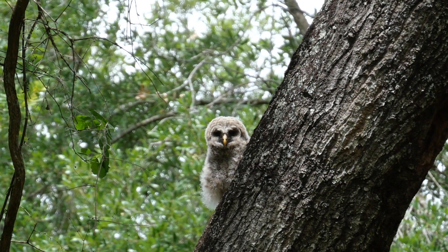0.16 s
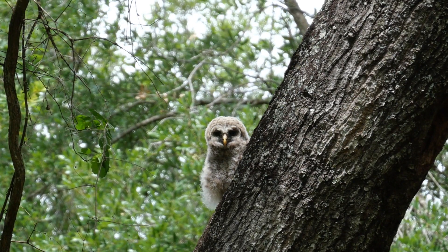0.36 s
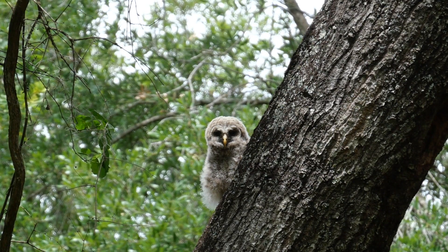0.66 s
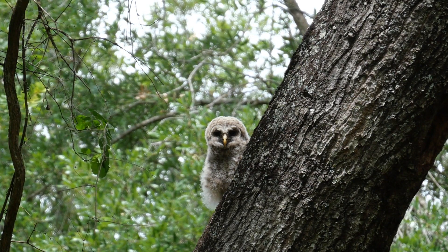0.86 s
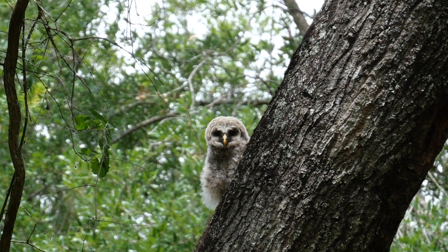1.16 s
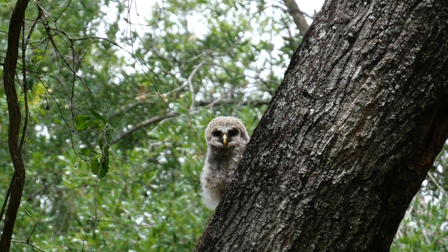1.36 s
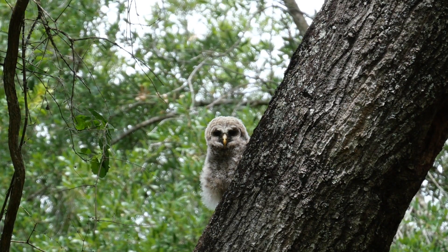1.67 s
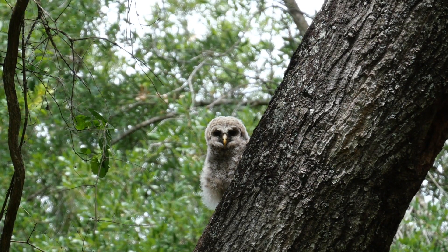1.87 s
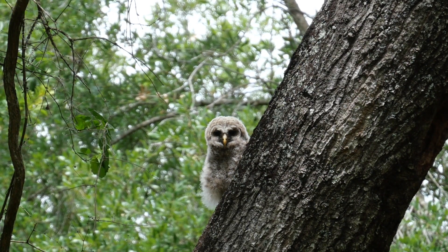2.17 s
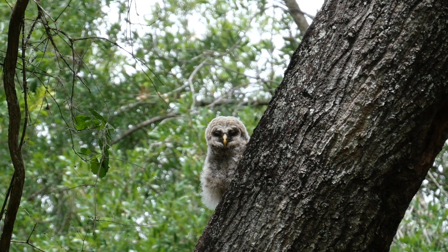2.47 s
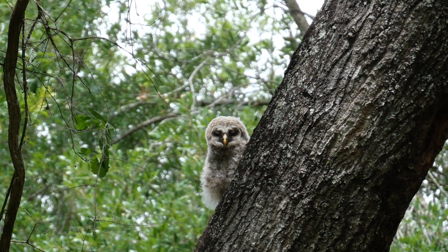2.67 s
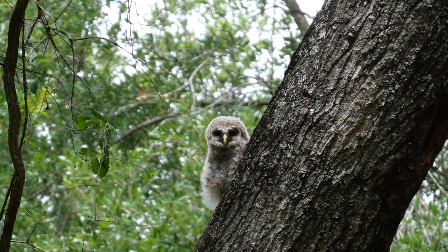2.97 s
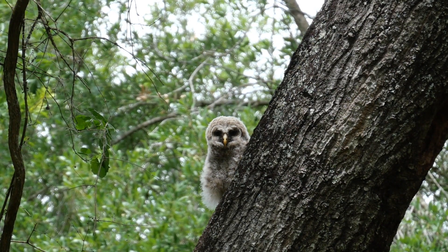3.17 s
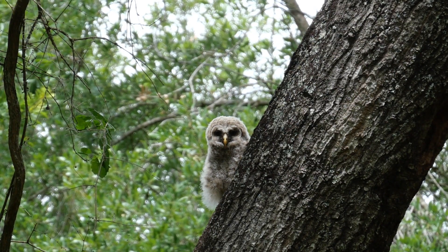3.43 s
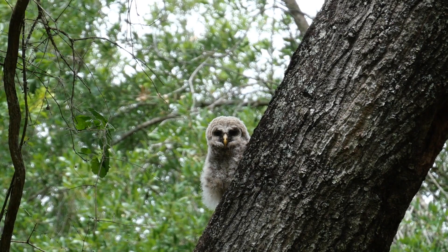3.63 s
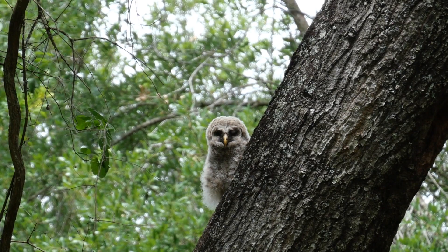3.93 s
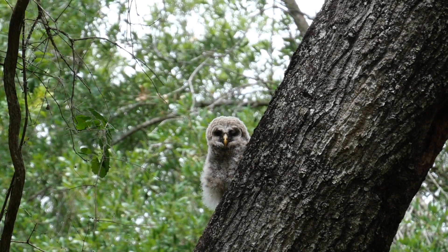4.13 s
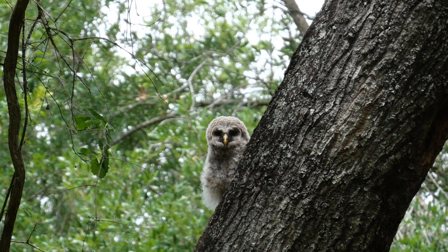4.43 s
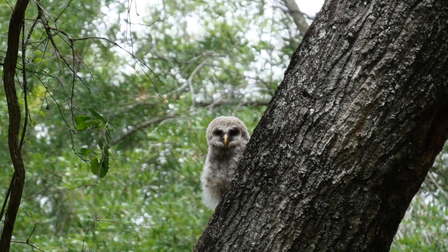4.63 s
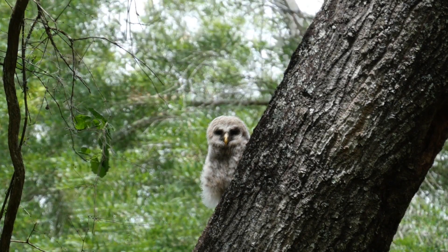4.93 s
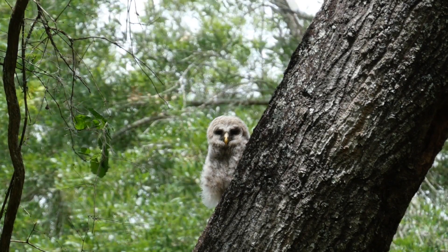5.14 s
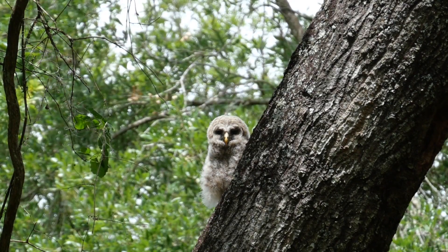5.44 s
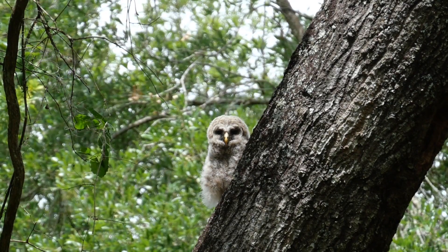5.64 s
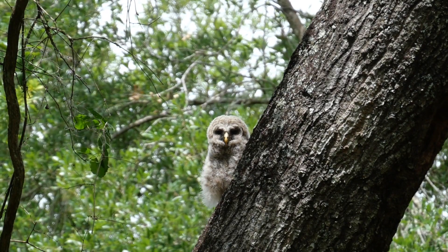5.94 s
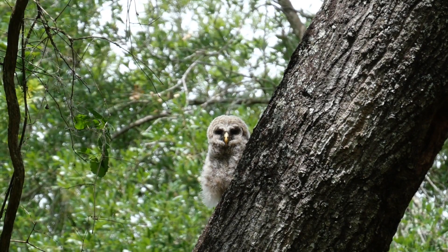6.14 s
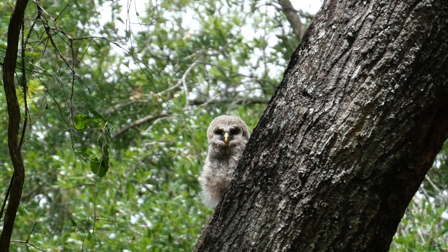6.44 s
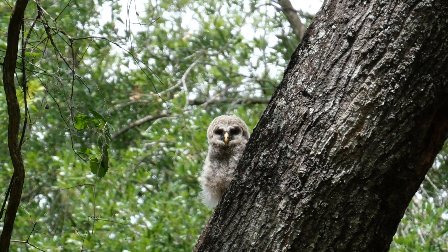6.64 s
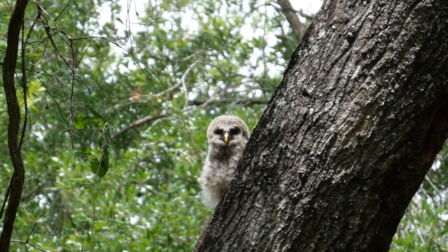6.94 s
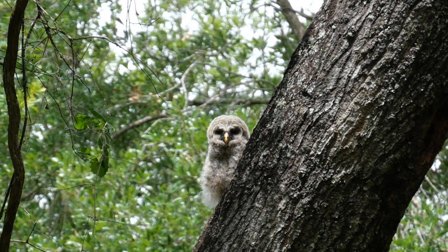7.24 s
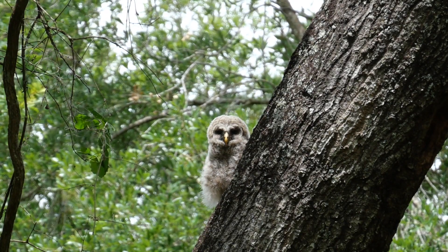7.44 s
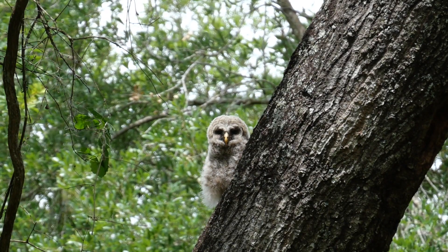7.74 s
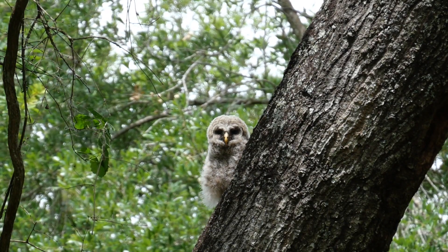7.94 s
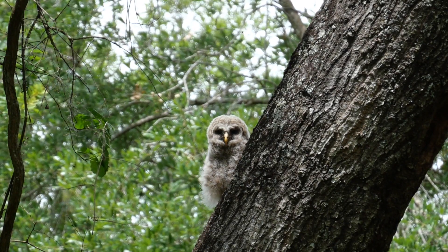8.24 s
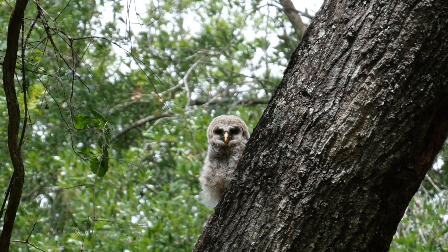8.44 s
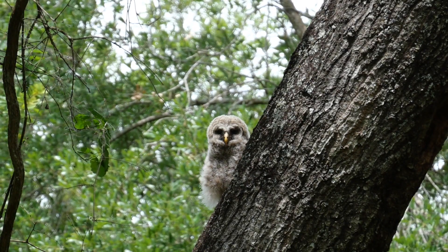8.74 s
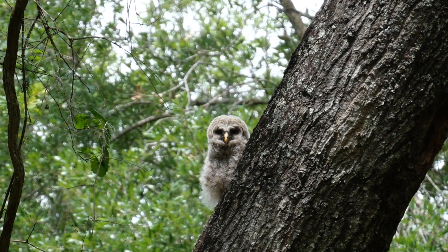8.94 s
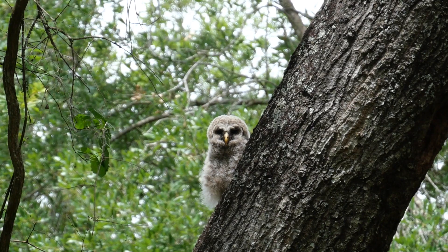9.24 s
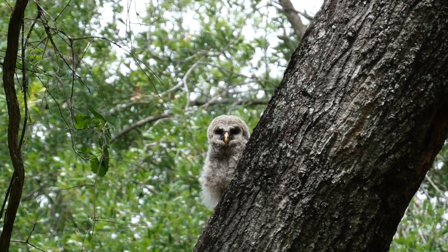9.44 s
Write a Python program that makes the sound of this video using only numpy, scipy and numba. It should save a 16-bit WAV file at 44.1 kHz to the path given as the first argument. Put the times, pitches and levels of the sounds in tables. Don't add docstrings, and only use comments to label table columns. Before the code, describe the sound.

In echoing woods, cicadas buzz steadily as an owl croaks, pauses, then cackles in an even run amid quick songbird phrases.

```python
import sys
import numpy as np
from scipy import signal
from scipy.fft import rfft, irfft
from scipy.io import wavfile
from numba import njit

SR = 44100
rng = np.random.default_rng(int(sys.argv[2]) if len(sys.argv) > 2 else 0)


def log_audio(samples):
    frames = np.atleast_2d(samples).T
    limited = np.clip(frames, -1, 1)
    pcm = np.round(limited * 32767).astype(np.int16)
    wavfile.write(sys.argv[1], SR, pcm)


def linear_from_db(decibels):
    return 10 ** (np.asarray(decibels, float) / 20)


N = 423360
LEAD = SR // 4

# (frequency [Hz], density [dB per Hz])
AIR_SPECTRUM = [(12, -43), (20, -10), (50, -1.5), (119, 1), (209, -6), (340, -14), (734, -21),
                (1210, -24.5), (2370, -26.5), (3810, -31), (6500, -32), (10800, -22.5), (11300, -38.5),
                (15800, -33)]
# (time [s], level [dB])
TRAFFIC_LEVEL = [(0, -55.5), (2, -54.5), (4.2, -53.5), (5, -55), (6, -54), (8, -54), (9.2, -52.5),
                 (9.6, -53)]
# (frequency [Hz], side minus mid [dB])
AIR_WIDTH = [(30, -21), (100, -36.5), (300, -20), (950, -14), (2380, -10.5), (5500, -3.5), (8500, -18),
             (11000, -46.5)]
# (low pitch [Hz], swing [Hz], strokes [per s], blur [Hz])
CICADA_DRUMS = [
    (9260, 1380, 70.5, 80),
    (9850, 560, 66.5, 150),
    (7350, 800, 69.0, 250),
]
# (before the hand-over [dB], after it [dB])
CICADA_LEVELS = [
    (-58, -60),
    (-73.5, -57),
    (-70.5, -68.5),
]
CICADA_THROB = [0, 0, 3.5]
# (start [s], length [s], voice [Hz], level [dB], slipped pulses [0-1])
NEAR_CROAKS = [(-.085, 0.05, 1018, -42.5, 0.19), (.39, 0.072, 1020, -45.5, 0.37),
               (1.205, 0.067, 1019, -45.5, 0.55), (1.738, 0.058, 971, -47.5, .7),
               (4.952, 0.071, 1007, -48, 0.22), (5.283, 0.062, 1029, -43, 0),
               (5.54, 0.06, 1044, -43.5, 0.31), (5.842, 0.054, 1048, -42, 0.1),
               (6.139, 0.069, 1053, -43, 0.4), (6.476, 0.065, 1060, -41.5, 0.14),
               (6.815, 0.069, 1057, -40.5, 0.19), (7.12, 0.045, 1033, -41, 0.55),
               (7.486, 0.0738, 1069, -40.5, .05), (7.868, 0.073, 1077, -39.5, 0.02),
               (8.261, 0.073, 1066, -40, .03), (8.668, 0.077, 1059, -39.5, 0.09),
               (9.083, .076, 1059, -40.5, .03), (9.508, 0.084, 1062, -39.5, .03)]
# (centre [Hz], width [Hz], level [dB])
UPPER_THROAT = (3150, 900, -8)
# (frequency [Hz], time [s])
WOOD_DECAY = [(500, 1.16), (1000, 1.04), (2500, 1.21), (3600, 1.4), (5600, 2.4), (9000, 0.76)]
# (start [s], length [s], from [Hz], to [Hz], level [dB])
HOARSE_NOTES = [
    (1.09, 0.078, 4730, 4600, -70.5),
    (2.69, 0.19, 2440, 2370, -66),
    (3.135, 0.14, 2510, 2730, -66),
    (4.657, 0.145, 4620, 2710, -63),
    (7.714, 0.155, 4620, 4150, -57.5),
    (8.238, 0.064, 4580, 4720, -58),
    (8.529, 0.1, 4560, 4430, -59),
]
# (start [s], length [s], from [Hz], to [Hz], level [dB])
SINGLE_NOTES = [(1.55, 0.055, 2280, 2000, -62), (1.624, 0.15, 1980, 2460, -60.5),
                (3.848, 0.047, 3130, 3270, -66), (4.194, 0.039, 3060, 4000, -64),
                (4.216, 0.018, 3960, 3670, -56.5), (4.331, .014, 2730, 4200, -49.5),
                (4.397, .026, 2200, 2530, -51.5), (4.415, 0.068, 2472, 2630, -44),
                (4.458, 0.011, 2530, 3270, -48), (4.58, 0.0095, 6760, 5440, -49),
                (4.589, 0.0088, 5660, 5610, -40), (4.783, 0.15, 2670, 2650, -65),
                (5.251, 0.036, 2700, 2640, -53), (5.463, 0.092, 2836, 3050, -45),
                (6.079, 0.045, 1850, 2480, -53), (7.557, .1, 2544, 2780, -38.5),
                (9.042, 0.051, 2740, 2480, -47), (9.167, 0.034, 3800, 3220, -46),
                (9.324, 0.064, 2700, 1995, -49)]
# (start [s], length [s], level [dB])
FAR_OWL_CROAKS = [
    (3.612, 0.064, -67),
    (3.945, 0.069, -63),
    (4.136, 0.038, -68),
    (4.402, 0.065, -61.5),
    (4.59, 0.043, -60),
]
# (start [s], length [s], from [Hz], level [dB], octave [dB])
RISING_WHISTLES = [(4.27, .062, 1800, -55, 1), (5.39, .07, 2600, -47, -30), (5.66, .09, 2600, -49, -26),
                   (5.91, .09, 2650, -48, -26), (6.2, .1, 2650, -49, -18), (6.41, .07, 2600, -48, -18),
                   (6.65, .118, 2550, -48, -15), (6.93, .124, 2450, -50, -14), (7.2, .118, 2450, -51, -11),
                   (7.515, .042, 2300, -54, 1), (7.93, .06, 2500, -53, -19)]
# (time [s], peak [dB])
SNAPS = [
    (4.897, -26),
    (5.452, -27),
    (5.52, -32),
]
# (time after the start [s], pitch [Hz], level [dB])
PHRASE_SLURS = [
    [(0, 6300, -12), (.008, 5600, -3), (.018, 4700, -3), (.024, 4450, -4), (.03, 4450, -14)],
    [(.039, 3000, -8), (.047, 3350, -1), (.055, 4200, -1), (.061, 4800, 0), (.073, 4900, -8)],
    [(.11, 3900, -8), (.118, 3750, 0), (.128, 3250, 0), (.136, 3000, -4), (.143, 2950, -14)],
]
# (start [s], level [dB], first slur [dB])
SUNG_PHRASES = [
    (5.094, -53, -12),
    (5.378, -44, -2.5),
    (5.666, -43.5, -4.5),
    (5.953, -43, -3),
    (6.246, -42.5, -3),
    (8.599, -46.5, -12),
    (8.876, -43.5, -3.5),
    (9.161, -43.5, -2),
    (9.446, -40.5, -2),
]


def at_hz(points, hz):
    table_hz, values = np.transpose(points)
    return np.interp(np.log(hz), np.log(table_hz), values)


def rms_one(x):
    return x / np.sqrt(np.mean(x ** 2) + 1e-20)


def filtered(x, order, hz, kind="low"):
    return signal.sosfilt(signal.butter(order, hz, kind, fs=SR, output="sos"), x)


def drift(rate, size):
    r = np.exp(-2 * np.pi * rate / SR)
    run_in = round(SR / rate)
    slow = signal.lfilter([1], [1, -2 * r, r * r], rng.standard_normal(size + run_in))
    return slow[run_in:] * np.sqrt((1 - r * r) ** 3 / (1 + r * r))


def resonance(x, hz, width_hz):
    r = np.exp(-np.pi * width_hz / SR)
    zeros = np.array([1, 0, -1]) * (1 - r * r) / 2
    return signal.lfilter(zeros, [1, -2 * r * np.cos(2 * np.pi * hz / SR), r * r], x)


@njit
def gliding(x, turn, r):
    y = np.zeros(len(x))
    for i in range(2, len(x)):
        y[i] = (1 - r * r) / 2 * (x[i] - x[i - 2]) + 2 * r * np.cos(turn[i]) * y[i - 1] - r * r * y[i - 2]
    return y


def add(track, start_s, sound):
    at = LEAD + round(start_s * SR)
    track[at:at + len(sound)] += sound[:len(track) - at]


def air():
    hz = np.maximum(np.fft.rfftfreq(N, 1 / SR), 1)
    mid, side = rfft(rng.standard_normal((2, N)))
    shape = linear_from_db(at_hz(AIR_SPECTRUM, hz))
    low = 1 / (1 + (hz / 400) ** 2)
    scale = np.sqrt(np.mean(irfft(mid * shape * (hz < 400), N) ** 2))
    side = linear_from_db(at_hz(AIR_WIDTH, hz)) * side
    stereo = np.array([mid + side, mid - side]) * shape / scale
    s, db = np.transpose(TRAFFIC_LEVEL)
    traffic = linear_from_db(np.interp(np.arange(N) / SR, s, db)) * irfft(stereo * low, N)
    return traffic + linear_from_db(-52.5) * irfft(stereo * (1 - low), N)


def cicadas():
    handover_s, handover_length_s = 5.13, 0.12
    throb_per_s, throb_top_s = 1.9, 0.98
    out, t = 0, np.arange(N) / SR
    after = (1 + np.tanh((t - handover_s) / handover_length_s)) / 2
    throb = np.cos(2 * np.pi * throb_per_s * (t - throb_top_s))
    for drum, levels, throb_db in zip(CICADA_DRUMS, CICADA_LEVELS, CICADA_THROB):
        low_hz, swing_hz, rate, blur_hz = drum
        before_db, after_db = levels
        db = before_db + (after_db - before_db) * after + throb_db * throb
        stroke = np.abs(np.sin(np.pi * np.cumsum(rate * (1 + .01 * drift(1.2, N))) / SR))
        hz = low_hz + swing_hz * stroke ** 1.8 + blur_hz * drift(400, N)
        buzz = np.sin(2 * np.pi * np.cumsum(hz) / SR)
        direct = buzz * (2.6 - stroke) * linear_from_db(1.5 * drift(300, N))
        echo = 0.88 * np.roll(direct, 176) + 0.17 * np.roll(direct, 1130) + 0.73 * np.roll(direct, 2470)
        side = .09 * np.roll(direct, 4000) * [[1], [-1]]
        out = out + linear_from_db(db) * (rms_one(direct + echo) + side)
    return signal.sosfilt(signal.cheby2(8, 30, 11150, fs=SR, output="sos"), out)


def beak(u):
    opens_at, opening = .17, .22
    shut_share = 0.793
    hum_top_at = 0.52
    opened = np.clip((u - opens_at) / opening, 0, 1)
    late = np.clip((u - opens_at - opening) / (1 - opens_at - opening), 0, 1)
    first_hz = 1012 + 240 * np.minimum(u / 0.49, 1)
    second = shut_share + (1 - shut_share) * opened
    slap_db = -7.5 + 1.5 * opened - 5 * late
    past = (u - hum_top_at) / hum_top_at
    hum_db = 2.3 + np.where(past < 0, 5.5, -36) * past
    hum_db = hum_db - 5 * np.maximum(1 - u / opens_at, 0)
    return first_hz, second, slap_db, hum_db


def membrane_slaps(u, cycles, slap_db, length_s, slips):
    skips = np.interp(u, [0, .27, .36, .74, .82, 1], [6, 7, 3, 3, 4.3, 4.4])
    slaps, at = np.zeros(len(u)), 1.
    for _ in range(40):
        slip, extra = rng.random(2)
        jitter = rng.standard_normal()
        i = np.searchsorted(cycles, at)
        if i >= length_s * SR:
            break
        slaps[i] = linear_from_db(slap_db[i] + .8 * jitter) * min((u[i] + .03) / .22, 1)
        at += skips[i] + (slip < slips) * np.ceil(2 * extra) + 0.02 * jitter
    return slaps


def membrane_hum(cycles, u, slips):
    phase = 2 * np.pi * cycles
    early = np.maximum(np.clip((.5 - u) / 0.94, 0, 1), slips)
    hum = np.sin(phase) + early * (linear_from_db(-1.5) * np.sin(2 * phase) + linear_from_db(-8.5) * np.sin(3 * phase))
    loose = slips * np.clip(1.6 - 3 * u, 0, 1)
    return hum + loose * (linear_from_db(-17) * np.sin(4 * phase) + linear_from_db(-10) * np.sin(5 * phase))


def croak(length_s, voice_hz, slips, throat_hz):
    size = round((length_s + .03) * SR)
    u = np.arange(size) / (length_s * SR)
    first_hz, second, slap_db, hum_db = beak(u)
    sag = .03 * np.clip((u - .55) / .45, 0, 1) ** 2
    cycles = np.cumsum(voice_hz * (1 - .12 * np.exp(-u / .2) - sag)) / SR
    slaps = membrane_slaps(u, cycles, slap_db, length_s, slips)
    edges = np.clip(np.minimum(u / 0.12, (1.08 - u) / 0.1), 0, 1)
    hiss = linear_from_db(-35) * linear_from_db(slap_db) * edges * rng.standard_normal(size)
    source = slaps + hiss
    rasp = linear_from_db(-2.0) * gliding(source, 2 * np.pi * first_hz / SR, np.exp(-np.pi * 260 / SR))
    rasp += gliding(source, 2 * np.pi * second * throat_hz / SR, np.exp(-np.pi * 430 / SR))
    upper_hz, upper_width_hz, upper_db = UPPER_THROAT
    upper_db = upper_db - 9.0 * (1.4 - np.minimum(u / 0.45, 1))
    rasp -= linear_from_db(upper_db) * resonance(source, upper_hz, upper_width_hz)
    rasp = filtered(rasp, 6, 3750)
    hum_level = edges * linear_from_db(hum_db + 8 * slips + 2.0 * drift(85, size))
    voice = rms_one(rasp) + hum_level * membrane_hum(cycles, u, slips)
    return filtered(filtered(voice, 6, 890, "high"), 2, 5000)


def owl(rows, throat_hz):
    out = np.zeros(N + LEAD)
    for start, length, voice_hz, db, slips in rows:
        add(out, start, linear_from_db(db) * croak(length, voice_hz, slips, throat_hz))
    return out


def wood(x):
    t = np.arange(round(1.2 * SR)) / SR
    noise, tail = rng.standard_normal((2, 2, len(t))), 0
    for k, low in enumerate(500 * 2. ** np.arange(0, 4.5, .5)):
        band = filtered(noise[k % 2], 2, [low, np.sqrt(2) * low], "band")
        tail = tail + band * linear_from_db(-60 * t / at_hz(WOOD_DECAY, 2 ** .25 * low))
    tail *= (1 - np.exp(-(t / 0.0056) ** 2)) * (1 + 1.7 * np.exp(-t / 0.016))
    mid, side = tail * [[1], [.05]] / np.sqrt(np.sum(tail[0] ** 2))
    answer = signal.fftconvolve(x[None], np.array([mid + side, mid - side]))
    flutter = linear_from_db(1.5 * drift(35, N))
    return flutter * answer[:, LEAD:LEAD + N]


def tone(hz, level, octave_db=-40):
    phase = 2 * np.pi * np.cumsum(hz * (1 + .007 * drift(60, len(hz)))) / SR
    wave = np.sin(phase) + linear_from_db(octave_db) * np.sin(2 * phase)
    return level * linear_from_db(1.8 * drift(50, len(hz))) * wave


def slur(length_s, from_hz, to_hz, bend, octave_db=-40):
    u = np.linspace(0, 1, round(length_s * SR))
    hz = from_hz + (to_hz - from_hz) * u ** bend
    return tone(hz, np.sqrt(np.sin(np.pi * u) + 1e-9), octave_db)


def hoarse_notes(out):
    for start, length, from_hz, to_hz, db in HOARSE_NOTES:
        size = round(length * SR)
        hz = np.linspace(from_hz, to_hz, size) * (1 + 0.0303 * drift(320, size))
        add(out, start, linear_from_db(db) * tone(hz, np.hanning(size) ** .5))


def single_notes(out):
    for start, length, from_hz, to_hz, db in SINGLE_NOTES:
        bend = 1.036 if to_hz > from_hz else 0.94
        add(out, start, linear_from_db(db) * slur(length, from_hz, to_hz, bend))


def whistles(out):
    flick_s, pressed_db = .011, -17
    for start, length, from_hz, db, octave_db in RISING_WHISTLES:
        top_hz = 2740 + .6 * max(from_hz - 2400, 0)
        bend = .95 - (top_hz - from_hz) / 2400
        swell_db = 5 * np.linspace(-.6, .4, round(length * SR))
        add(out, start, linear_from_db(db + swell_db) * slur(length, from_hz, top_hz, bend, octave_db))
        if octave_db > pressed_db:
            flick = slur(flick_s, top_hz, top_hz + 800, 1.036, -13)
            add(out, start + length - flick_s / 2, linear_from_db(-54) * flick)


def phrases(out):
    for start, db, first_db in SUNG_PHRASES:
        for k, note in enumerate(PHRASE_SLURS):
            s, hz, note_db = np.transpose(note)
            t = np.arange(s[0], s[-1], 1 / SR)
            level = linear_from_db(db + first_db * (k == 0) + np.interp(t, s, note_db))
            level = level * signal.windows.tukey(len(t), .2)
            add(out, start + s[0], tone(np.interp(t, s, hz), level))


def songbirds():
    out = np.zeros(N + LEAD)
    for sing in (hoarse_notes, single_notes, whistles, phrases):
        sing(out)
    return out


def far_owl():
    voice_hz, slips = 1087, .3
    rows = [(s, length, voice_hz, db, slips) for s, length, db in FAR_OWL_CROAKS]
    return signal.lfilter([.1], [1, -.9], owl(rows, 2300)) * linear_from_db(8.0)


def ticks():
    out = np.zeros(N)
    for s, db in SNAPS:
        out[round(s * SR)] = linear_from_db(db)
    return filtered(out, 2, [1200, 7000], "band")


def scene():
    near, birds, far = owl(NEAR_CROAKS, 2391), songbirds(), far_owl()
    direct = (near + linear_from_db(-2.5) * far + birds)[LEAD:]
    answer = wood(linear_from_db(-4) * near + far + linear_from_db(-7) * birds)
    return direct + answer + cicadas() + air() + ticks()


def band_limit(x):
    return signal.sosfilt(signal.butter(12, 15980, fs=SR, output="sos"), x)


def record(dry):
    mix = signal.sosfilt(signal.cheby2(12, 60, 15950, fs=SR, output="sos"), dry)
    return band_limit(mix)


dry = scene()
out = record(dry)
log_audio(out)
```